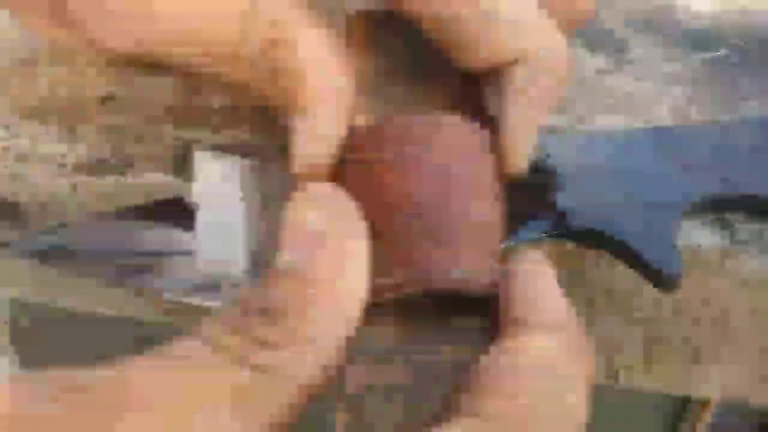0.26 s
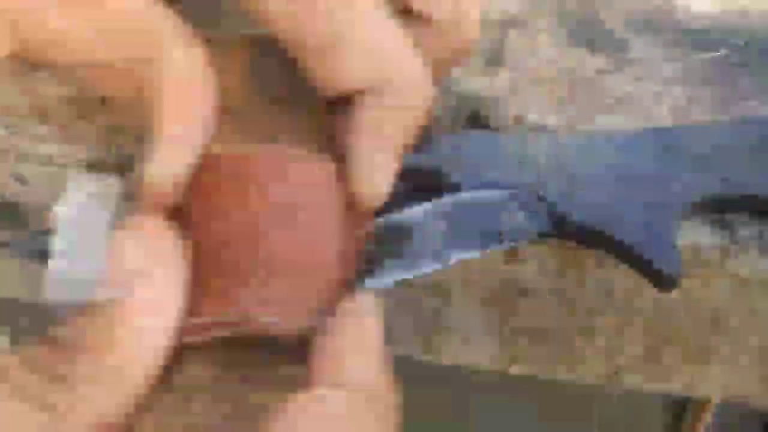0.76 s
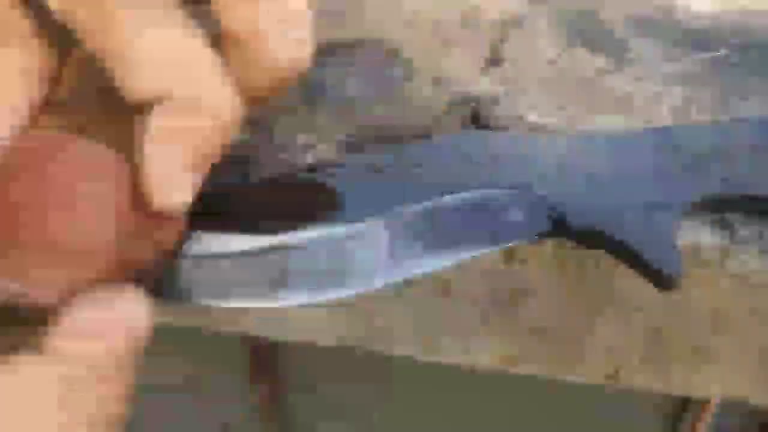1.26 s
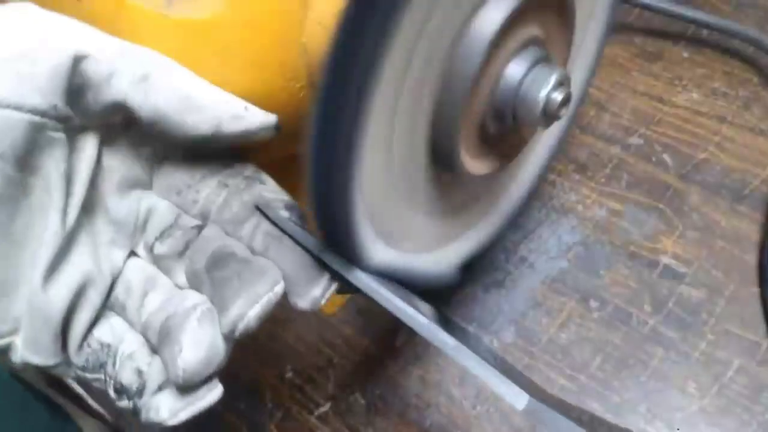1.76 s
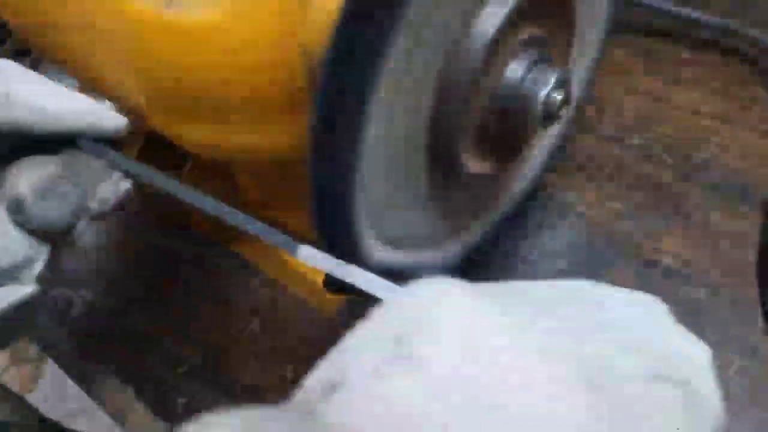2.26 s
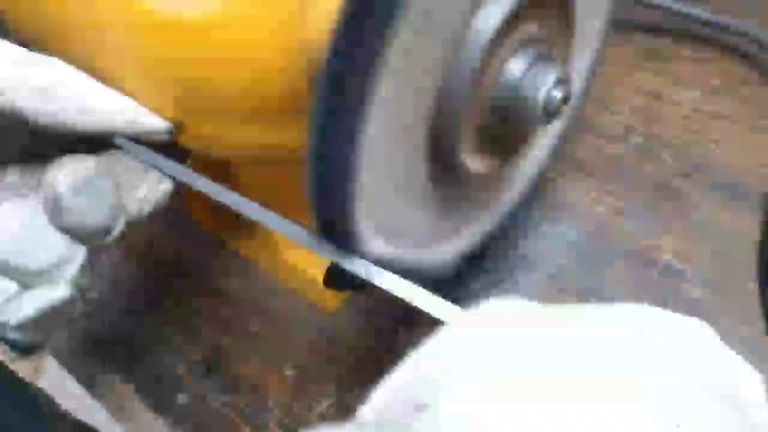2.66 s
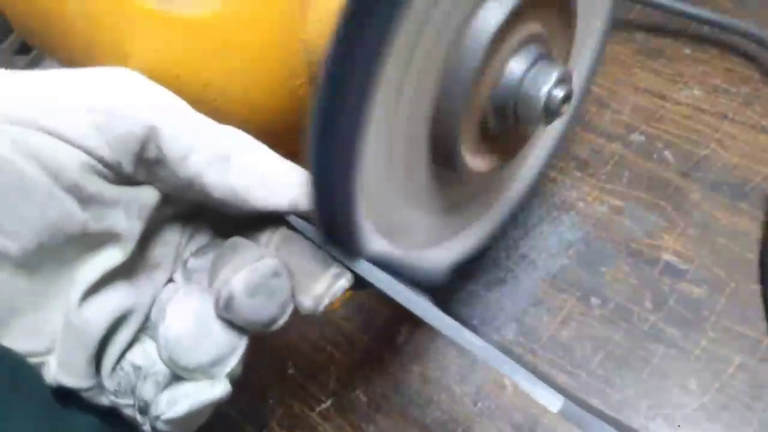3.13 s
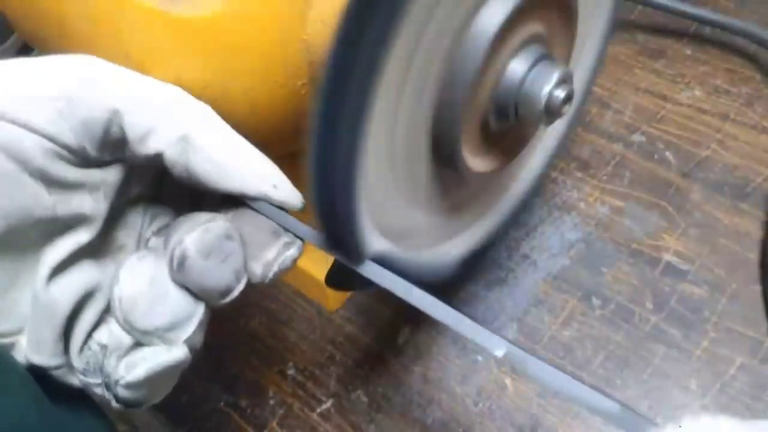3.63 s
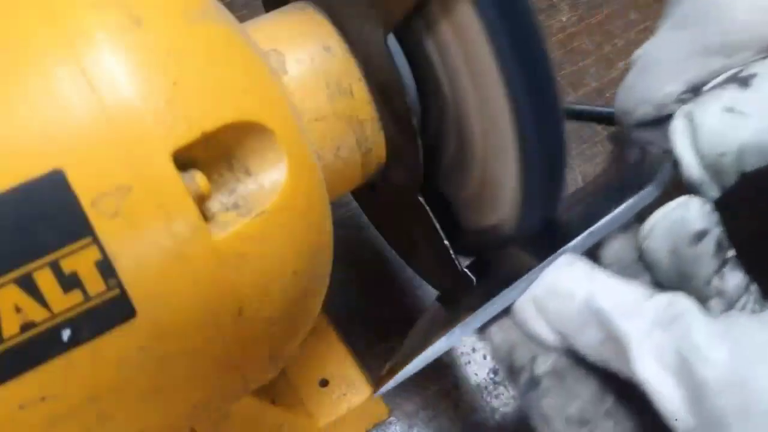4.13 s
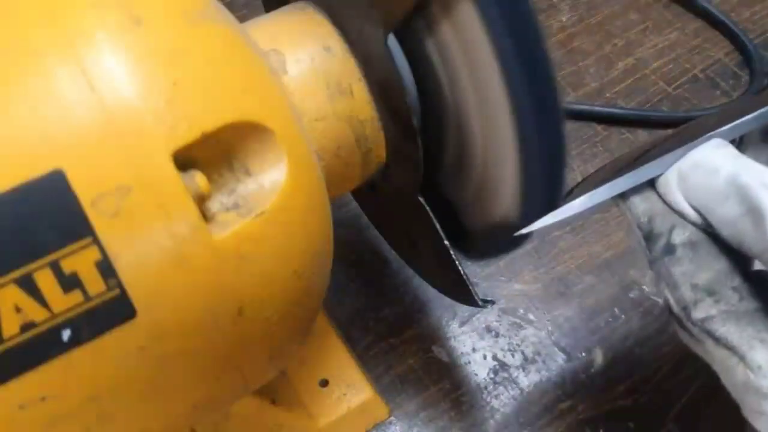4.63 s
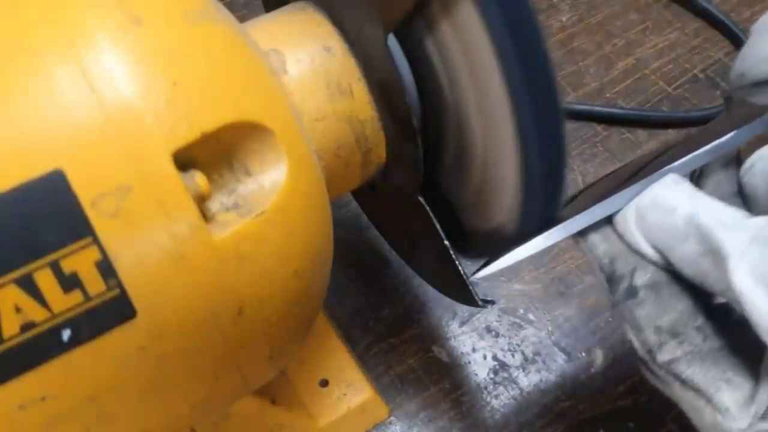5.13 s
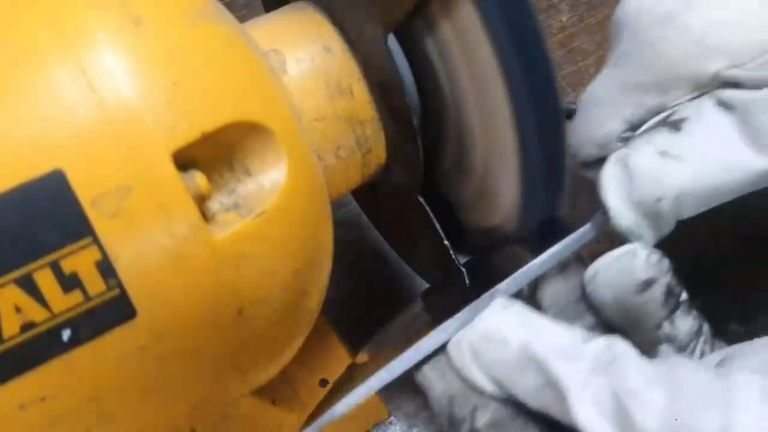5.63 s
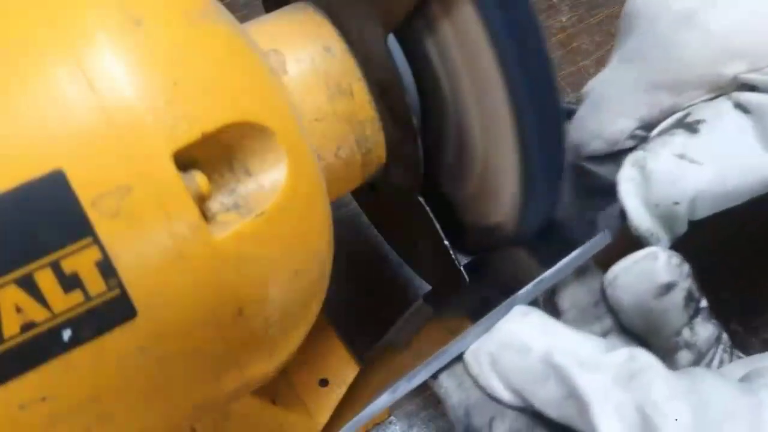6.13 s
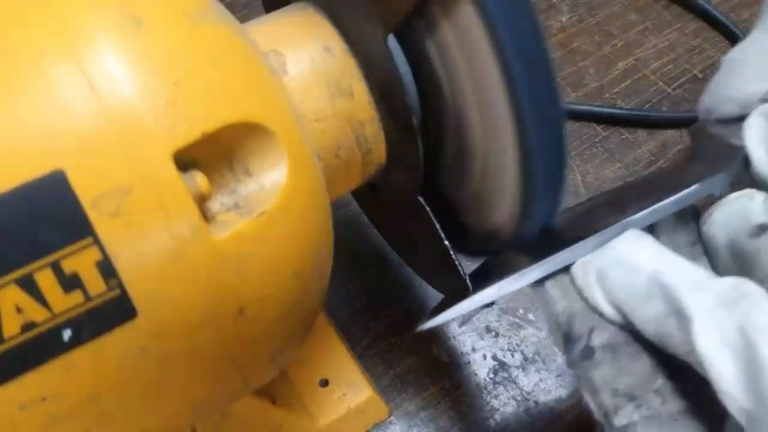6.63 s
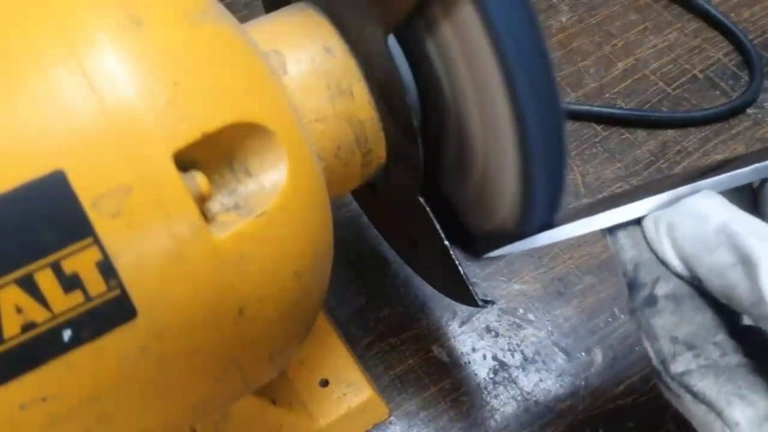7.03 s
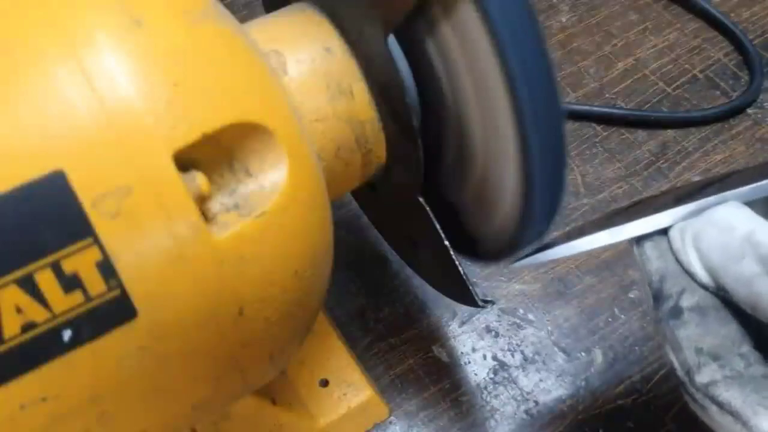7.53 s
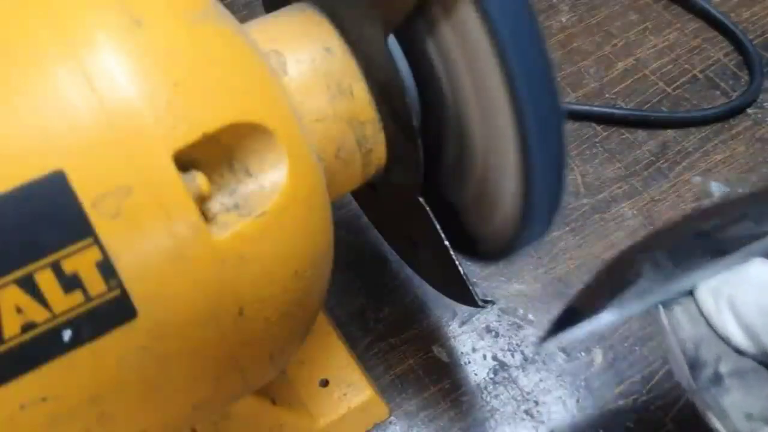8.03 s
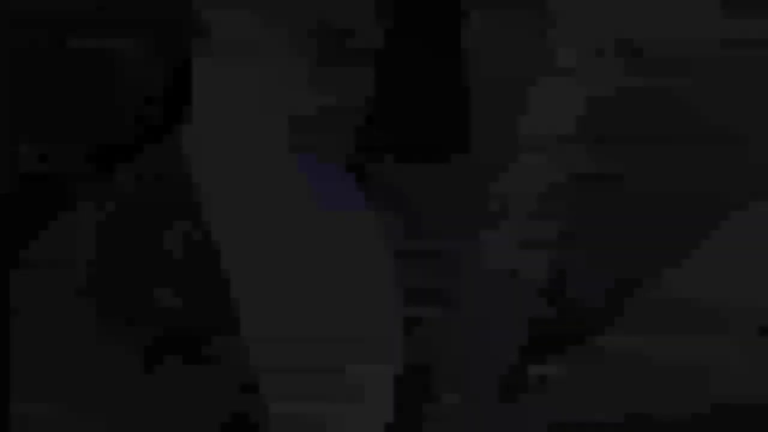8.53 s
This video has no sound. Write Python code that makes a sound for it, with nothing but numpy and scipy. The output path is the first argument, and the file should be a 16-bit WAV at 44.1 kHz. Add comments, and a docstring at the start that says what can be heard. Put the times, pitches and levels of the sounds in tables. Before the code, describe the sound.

Close workshop sounds. Very fast sandpaper strokes rasp over a steel blade, about ten a second, bright and hissy. A cut brings a spinning wheel scraping the blade, with shifting metallic ringing over a low motor hum. A second angle continues the scrape, which lifts off to leave the motor idling. It cuts to faint dull background, soft rubs and low handling thumps, mainly on the left.

```python
"""A steel blade makes two passes over a bench grinder's buffing wheel: random rim roughness, repeated each turn,
is filtered into scrape and blade modes over a motor hum that sags under load and idles at the end.
Before it, quick sandpaper strokes along the blade: grit noise and steel modes gated by hand speed.
After it, a quiet spot of faint noise and soft rubs. Low swept thumps, most of them late, favour one port
or the other of a two-port microphone, at last the left."""
import sys
import numpy as np
from scipy import signal
from scipy.fft import irfft
from scipy.io import wavfile
from scipy.ndimage import uniform_filter1d

SR = 44100
rng = np.random.default_rng(int(sys.argv[2]) if len(sys.argv) > 2 else 0)


def persist_wave(psi):
    """Save psi, clipped to +-1, as 16-bit WAV."""
    counts = np.round(np.clip(psi, -1, 1) * 32767).astype(np.int16)
    wavfile.write(sys.argv[1], SR, np.atleast_2d(counts).T)


def volts_from_decibels(level):
    """Turn decibel levels (scalar or array-like) into linear amplitude factors."""
    exponent = np.asarray(level, float) / 20
    return 10 ** exponent


N = 387193
FRAME = 1024  # samples in a short-time spectrum
HZ = np.fft.rfftfreq(FRAME, 1 / SR)[:, None]


def power_of(db):
    """Decibels to a power ratio."""
    return volts_from_decibels(2 * np.asarray(db))


def read(points, hz=HZ):
    """Value of a (hz, value) table, interpolated on a log frequency axis."""
    f, value = np.transpose(points)
    return np.interp(np.log(hz + 1), np.log(f + 1), value)


def bump(hz, width):
    """Power curve of a steep-sided resonance; width lies between its quarter-power points."""
    return 1 / (1 + (2 * (HZ - hz) / width) ** 2) ** 2


def lifts(modes):
    """Power curve of (hz, width_hz, lift_db) resonances standing on a flat base."""
    return 1 + sum((power_of(db) - 1) * bump(f, w) for f, w, db in modes)


def unit(power, lo_hz=0, hi_hz=30000):
    """Scales a power shape so that white noise leaves it with rms 1 inside the band."""
    return power * len(HZ) / (power * ((HZ >= lo_hz) & (HZ < hi_hz))).sum(0)


def spectra(x):
    """Short-time spectra and their times."""
    return signal.stft(x, SR, nperseg=FRAME, noverlap=FRAME * 3 // 4)[1:]


def noise(size):
    """Spectra of two unrelated white noises."""
    return spectra(rng.standard_normal((2, size)))[1]


def grit(shape, spread_db):
    """Dense random grains, a few larger; rms 1."""
    x = rng.standard_normal(shape) * volts_from_decibels(spread_db * np.minimum(rng.exponential(1, shape[-1]), 4.5))
    return x / x.std()


def patchy(frames, across, size):
    """Random dB field of rms 1, smoothed over `across` frames and `size` frequency bins."""
    field = rng.standard_normal((frames, len(HZ)))
    field = uniform_filter1d(uniform_filter1d(field, across, 0), size, 1).T
    return field / field.std()


def heard(z, power, same, left, size):
    """Two microphone ports: colours two raw drives and blends them; power is that of the ports' mean."""
    likeness = np.clip(read(same), -np.sqrt(.5), 1)
    left_gain = volts_from_decibels(read(left))
    lag_phase = 2 * np.pi * HZ * 4e-5  # the left port hears 40 microseconds later
    pair = np.array([left_gain * z[0] * np.exp(-1j * lag_phase),
                     likeness * z[0] + np.sqrt(1 - likeness ** 2) * z[1]])
    mean_gain = np.sqrt(1 + left_gain ** 2 + 2 * likeness * left_gain * np.cos(lag_phase)) / 2
    pair *= np.sqrt(power) / mean_gain
    return signal.istft(pair, SR, nperseg=FRAME, noverlap=FRAME * 3 // 4)[1][:, :size]


QUIET_START_S = 8.584
# dull background of the quiet spot: hz, relative level_db
QUIET_SPECTRUM = [(40, 9), (300, 1), (600, -11), (790, -18), (950, -4.5), (1200, -21), (1450, -24),
                  (2200, -29), (6500, -38), (16000, -47)]
# faint rubs: peak_s, level_db, swell_s
RUBS = [(8.6, -71, 0.018), (8.71, -64, 0.013), (8.76, -65, .014)]
# resonances of the rubs: hz, width_hz, relative level_db
RUB_RING = [(950, 130, 0.), (1210, 150, -2)]
# microphone ports; one table each for the sanding, the two passes and the quiet spot
# hz, left-right likeness (clipped to -0.71..1)
PORT_LIKENESS = [
    [(60, 2), (380, 0.7), (2380, 0.2), (15000, -0.26)],
    [(60, -3.5), (380, 0.68), (2380, 0.24), (15000, -0.06)],
    [(60, -1), (240, 1.25), (950, 0.09), (3770, 0.5), (15000, -0.42)],
    [(60, 1), (15000, 0)],
]
# hz, left over right level_db
PORT_BALANCE = [
    [(60, 0.58), (150, 1.4), (380, 2.6), (950, 9.7), (2380, 6.5), (5980, 1.9), (9500, 7), (15000, 13)],
    [(60, -20), (130, -11), (290, -8), (640, 6.5), (1410, 5), (3100, -2), (6820, 8), (15000, 10)],
    [(60, 0.5), (130, 1.0), (290, 0.55), (640, 3.4), (1410, 7.7), (3100, 4.5), (6820, 1.4), (9500, 6.8),
     (15000, 3.5)],
    [(100, 7.1), (1000, 7.1), (15000, 4.4)],
]


def quiet_spot():
    """Dull shaped noise, a lingering hiss that dies, and rubs as resonant noise under smooth swells."""
    s = np.arange(round(QUIET_START_S * SR), N) / SR

    def placed(power):
        return heard(noise(len(s)), power, PORT_LIKENESS[3], PORT_BALANCE[3], len(s))

    bed = volts_from_decibels(-70) * placed(unit(power_of(read(QUIET_SPECTRUM)), 700))
    ring = placed(unit(sum(power_of(db) * bump(f, w) for f, w, db in RUB_RING)))
    hiss = volts_from_decibels(-73) * placed(unit(bump(3000, 9000))) * np.clip((8.63 - s) / .03, 0, 1)
    swells = sum(volts_from_decibels(db) * np.exp(-((s - at) / swell) ** 2) for at, db, swell in RUBS)
    return bed + hiss + ring * swells


# low thumps: peak_s, level_db, base pitch_hz (swept from 0.72 up to 1.52 times), swell_s, left over right level_db
THUMPS = [(4.6, -50, 119, 0.013, -8), (7.582, -52, 129, 0.022, -10), (7.67, -47, 109.5, 0.034, 16),
          (8.391, -50, 90, 0.041, 18), (8.595, -45, 149.6, 0.0056, 17), (8.637, -25.5, 140.4, 0.0078, 20),
          (8.665, -37.5, 95.4, 0.012, 13), (8.761, -30, 103.6, 0.012, 18)]


def thumps():
    """A few wobbling low cycles each, swelling and dying, highest in pitch at the peak."""
    out = np.zeros((2, N))
    for (at, db, hz, rise, left_db), phase in zip(THUMPS, rng.random((len(THUMPS), 2))):
        t = np.arange(-.08, min(.12, N / SR - at), 1 / SR)
        size = np.exp(np.where(t < 0, t / rise, -t / (0.92 * rise)))
        turns = np.cumsum(hz * (0.72 + 0.8 * size ** 3)) / SR
        wave = np.sin(2 * np.pi * (turns + phase[0]))
        wave = wave + 0.15 * size * np.sin(2 * np.pi * (2.3 * turns + phase[1]))
        pair = np.array([wave, np.roll(wave, round(0.0027 * SR))])  # 2.7 ms later on the right
        ports = 2 / (1 + volts_from_decibels([[-left_db], [left_db]]))
        thump = volts_from_decibels(db) * ports * uniform_filter1d(size, 150) * pair
        part = out[:, round((at - .08) * SR):][:, :len(t)]
        part += thump[:, :part.shape[1]]
    return out


# one row a stroke, pulls and pushes in turn:
# start_s, end_s, hiss level_db, first bite over the hiss level_db, blade rasp level_db
STROKES = [(0.0, 0.017, -36, 5.5, -51), (0.033, 0.072, -31.5, -3, -51.5), (0.088, 0.124, -33.5, 1.5, -52.5),
           (0.139, 0.177, -36, 1, -52.5), (0.189, 0.231, -32.5, 1.5, -57), (0.243, 0.285, -36.5, -2, -50.5),
           (0.297, 0.34, -34, 2, -56.5), (0.356, 0.394, -33.5, -3, -47.5), (0.406, 0.448, -37, 4.5, -58),
           (0.46, 0.5, -37.5, 1, -46), (0.513, 0.551, -39, 6.5, -54), (0.563, 0.603, -35.5, 0.5, -44.5),
           (0.614, 0.651, -36.5, 1, -56), (0.666, 0.706, -34, -2.5, -46), (0.721, 0.755, -37, 4, -58),
           (0.768, 0.81, -32, -9, -46.5), (0.827, 0.856, -36, 5, -58), (0.873, 0.918, -31, -7, -51.5),
           (0.933, 0.963, -35.5, 5.5, -63), (0.979, 1.021, -32, 2.5, -56.5),
           (1.034, 1.068, -33, -1.5, -57.5), (1.09, 1.125, -37, 4, -60), (1.136, 1.17, -33, 1.5, -53.5),
           (1.18, 1.222, -34, -2, -57.5), (1.238, 1.273, -34.5, 5.5, -59), (1.286, 1.328, -35, 0, -51.5),
           (1.34, 1.381, -30.5, -1, -58), (1.391, 1.429, -33.5, -5, -49.5), (1.444, 1.459, -28, -1, -60)]
# grit hiss: hz, relative level_db
PAPER = [(2060, -49), (3500, -13.5), (5040, -10), (6200, -9), (7530, -2.5), (8220, 2.5), (9440, 5),
         (12800, -7), (16000, -7)]
# clamped blade modes: hz, base width_hz (played 1.6 times wider), relative level_db
RASP = [(1652, 35, 7.5), (1935, 22, 7), (2700, 560, 4.5), (4970, 290, 2.5)]
# shop background: hz, relative level_db
SHOP = [(30, -48), (60, -14), (100, -15), (240, 0), (400, -15), (900, -20), (1700, -9), (5000, -1.5),
        (16000, -34)]


def sanding():
    """Each stroke drags grit over steel, hissing and shaking blade modes; the hand stops briefly at each turn."""
    size = round(1.47 * SR)
    s = np.arange(size) / SR
    same, left = PORT_LIKENESS[0], PORT_BALANCE[0]
    start, end, hiss_db, early_db, rasp_db = np.transpose(STROKES)
    # level knots: the first bite of each stroke, then its body
    knots = np.ravel([start + 0.038 * (end - start), start + 0.37 * (end - start)], "F")
    hiss_level = volts_from_decibels(np.interp(s, knots, np.ravel([hiss_db + early_db, hiss_db], "F")))
    rasp_level = volts_from_decibels(np.interp(s, knots, np.ravel([rasp_db + 3, rasp_db], "F")))
    inside = np.max([np.minimum((s - a + 0.0016) / 0.0026, (b - s) / 0.0013) for a, b in zip(start, end)], 0)
    speed = 1 / (1 + np.exp(-1.5 * inside))

    t, z = spectra(grit((2, size), spread_db=1.5))
    paper = power_of(read(PAPER) + 2.2 * patchy(len(t), 5, size=25))
    hiss = heard(z, unit(paper, 5200), same, left, size) * hiss_level * (speed + volts_from_decibels(-39.0))
    catch = uniform_filter1d(rng.standard_normal(size), size=90)
    hiss = hiss * volts_from_decibels(1.3 * catch / catch.std())  # the paper catches and slips

    modes = sum(power_of(db) * bump(f, 1.6 * w) for f, w, db in RASP) + power_of(-1.0) * bump(3860, 4200)
    modes = modes * power_of(2.5 * patchy(len(t), 8, size=10))  # the rasp's colour flickers
    rasp = heard(noise(size), unit(modes, 1200, 5160), same, left, size)
    rasp *= rasp_level * (speed + volts_from_decibels(-11.))  # the steel sounds on through the turn

    room = heard(noise(size), power_of(-54) * unit(power_of(read(SHOP))), same, left, size)
    return (hiss + rasp + room) * np.clip((end[-1] - 0.001 - s) / 0.0028, 0, 1)


# share of the rim that returns each turn, before the caller's repeat factor: hz, share
REPEATS = [(100, 0.22), (800, 0.95), (3000, 0.69), (7000, 0.56), (15000, 0.4)]


def rim(turns, s, drift_per_s, high_spot, repeat):
    """Roughness read off the wheel rim each turn; the track under the blade slowly wanders to a new one."""
    track = drift_per_s * (s - s[0])
    steps = rng.standard_normal((2, 2, int(track[-1]) + 2, 300))
    phase = 2 * np.pi * rng.random((2, 1, 300)) + np.cumsum(steps[0], 1)
    rows = irfft(volts_from_decibels(1.8 * steps[1]) * np.exp(1j * phase), 2400)  # one turn of rim per track
    at, row, part = (turns % 1 * 2400).astype(int), track.astype(int), track % 1
    swell = np.exp(high_spot * np.cos(2 * np.pi * turns))  # the wheel is a little out of round
    returning = ((1 - part) * rows[:, row, at] + part * rows[:, row + 1, at]) * swell
    fresh = grit(returning.shape, spread_db=1.3)
    t, (a, b) = spectra(np.array([returning / returning.std(), fresh]))
    share = np.clip(repeat * read(REPEATS), 0, 1)
    return t + s[0], np.sqrt(share) * a + np.sqrt(1 - share) * b


# one row a pass, running free: shaft tone level_db, bench rumble level_db, wheel whirr level_db
MOTOR = [(-62, -74, -50.5), (-57.5, -70, -53)]
# shaft tones: multiple of the turn rate, relative level_db, gain in dB for each turn a second lost
SHAFT = [(1, -0.5, 0), (2, -15, 2.5), (3, -10.5, -3.5), (4, -12.5, 1.9), (5, -13.5, -1.4), (6, -19, -0.6)]
# bench rumble: hz, relative level_db
RUMBLE = [(30, -35), (60, -5), (110, -8), (300, -14.5), (480, -24.5), (700, -14), (1300, -41)]
# wheel whirr: hz, relative level_db
WHIRR = [(300, -12), (500, -11), (1500, -17), (4000, -19), (9000, -18), (11000, -19.5), (16000, -15.5)]
# motor housing modes: hz, width_hz, lift_db
WHINES = [(5280, 230, 9.5), (6450, 150, 10.5), (7625, 440, 21), (9120, 330, 9), (12900, 620, 7.5)]
# microphone ports for the motor: hz, left-right likeness
MOTOR_LIKENESS = [(60, 0.27), (300, 1), (900, 0.49), (4000, .1)]
# hz, left over right level_db
MOTOR_BALANCE = [(60, 4.5), (130, 2.1), (290, 2.0), (640, 4.5), (1410, 4.4), (3100, 1.9), (6820, 20),
                 (15000, 11)]
# hum change for each turn a second lost under load, one a pass [dB]
HUM_SAG_DB = [-0.48, -2]
# the motor swells in and thins out over these times, one a pass [s]
MOTOR_IN_S = [0.18, .01]
MOTOR_OUT_S = [0.0026, 0.042]


def motor(k, s, speed, turns):
    """Shaft harmonics follow the turn rate; partly repeating rim noise drives bench rumble and housing whines."""
    start, end, _ = PASSES[k]
    shaft_db, rumble_db, whirr_db = MOTOR[k]
    t, z = rim(turns, s, drift_per_s=12.0, high_spot=0.31, repeat=0.46)
    rumble = power_of(rumble_db) * unit(power_of(read(RUMBLE)), 95, 480)
    whirr = unit(lifts(WHINES) * power_of(read(WHIRR)))
    whirr = whirr * power_of(2.4 * patchy(len(t), 14, size=8))  # the whirr flickers
    whirr = whirr / lifts(WHINES) ** np.clip((t - 8.47) / 0.065, 0, 1)  # the whines fade first
    whirr = whirr * power_of(whirr_db - 2.4 * np.clip((t - 8.47) / 0.2, 0, 1))

    lost = 75.67 - speed  # turns a second below free running
    waver_db = 3 * patchy(len(t), 30, size=1)
    tones = 0
    for (m, db, load_db), w in zip(SHAFT, waver_db):
        level_db = db + load_db * lost + (m > 1) * np.interp(s, t, w)  # only the overtones waver
        tones = tones + volts_from_decibels(level_db) * np.sin(2 * np.pi * (m * turns + rng.random()))
    hum = np.sqrt(2) * volts_from_decibels(shaft_db + HUM_SAG_DB[k] * lost) * tones * volts_from_decibels([[1.5], [-1.5]])

    edge = 1 - np.clip(np.minimum((s - start) / MOTOR_IN_S[k], (end - s) / MOTOR_OUT_S[k]), 0, 1)
    return (hum + heard(z, rumble + whirr, MOTOR_LIKENESS, MOTOR_BALANCE, len(s))) * volts_from_decibels(-5 * edge)


# blade modes that sing out while the grip frees them: start_s, end_s, pitch_hz, full lift_db
SINGS = [(1.48, 2.35, 944, 6.5), (1.84, 2.35, 2830, 9), (2.13, 2.36, 2280, 12.5), (2.88, 3.16, 720, 9),
         (2.66, 3.155, 973, 9), (2.56, 3.2, 2300, 7), (3.24, 3.94, 993, 12.5), (3.24, 3.54, 1800, 11),
         (3.3, 3.65, 3280, 8.5), (3.49, 3.98, 2230, 14.5), (3.59, 4.02, 723, 11), (3.998, 4.55, 2280, 7.5),
         (3.96, 4.6, 2400, 9), (3.94, 4.9, 2810, 2.5), (3.993, 4.3, 3200, 11), (5.68, 5.92, 2750, 5.5),
         (4.65, 4.97, 1470, 9), (5.25, 5.698, 2620, 7.5), (5.647, 6.2, 1545, 12), (5.7, 6.1, 2330, 10),
         (5.947, 6.6, 2060, 11), (5.9, 6.75, 1910, 10.5), (3.997, 4.3, 1270, 8.5), (7.24, 7.52, 2170, 6),
         (7.2, 7.52, 1900, 14.5), (1.55, 2.13, 6750, 8.5), (1.42, 1.86, 9700, 7), (2.1, 2.9, 5130, 9.5),
         (2.74, 3.25, 8320, 8), (2.9, 3.95, 11600, 6.5), (3.1, 4.1, 3950, 7.5), (3.1, 3.7, 14300, 7),
         (3.3, 4.06, 5120, 8), (3.2, 3.8, 7400, 5), (4.55, 5.7, 5300, 3), (4.56, 5.2, 8360, 6),
         (5.7, 6.25, 6550, 6), (6.1, 6.75, 6350, 4), (6, 7.05, 7870, 4), (5.9, 6.7, 13200, 4)]


def singing(t):
    """Power lift of the blade modes that are free at each moment; higher modes are wider."""
    lift = 1
    for start, end, hz, db in SINGS:
        free = np.clip(np.minimum(t - start, end - t) / .22 + .5, 0, 1) ** 2
        lift = lift + (power_of(db) - 1) * bump(hz, 45 + .03 * hz) * free
    return lift


# blade on the wheel, one table a pass:
# time_s, scrape level_db, how freely the blade flexes (0-1), low flexing pitch_hz, middle flexing pitch_hz
CONTACT = [
    [(1.49, -47.5, 0.16, 910, 2900), (1.59, -37.5, 0.4, 980, 3270), (1.97, -38.5, 0.38, 990, 3000),
     (2.13, -40.5, 0.88, 1000, 3300), (2.32, -37.5, 0.69, 950, 2700), (2.41, -47, 0.2, 810, 2770),
     (2.55, -47, 0.4, 780, 2920), (2.68, -40, 0.58, 1050, 2510), (2.96, -36.5, 0.65, 950, 2500),
     (3.2, -37, 0.34, 1030, 2770), (3.46, -36, 0.56, 1085, 2790), (3.68, -38, 0.54, 914, 2630),
     (3.88, -34.5, 0.66, 890, 2800), (3.94, -43, 0.83, 870, 2500), (4.0, -43, 1, 939, 2600)],
    [(4.01, -37, 0.94, 905, 2500), (4.15, -37.5, 0.92, 1050, 2500), (4.43, -37.5, 0.85, 950, 2570),
     (4.66, -36.5, 0.43, 930, 2600), (4.87, -37.5, 0.3, 890, 2900), (5.25, -41.5, 0.47, 830, 2700),
     (5.42, -41, 0.49, 1260, 2580), (5.59, -41.5, 0.57, 950, 2440), (5.79, -39, 0.91, 1055, 2500),
     (5.97, -37, 0.43, 925, 2260), (6.15, -37.5, 0.7, 950, 2700), (6.38, -36.5, 0.66, 1040, 2750),
     (6.48, -37.5, 0.67, 900, 2810), (7.01, -40, 0.6, 915, 3100), (7.18, -43, 0.46, 950, 3000),
     (7.26, -41, 0, 980, 2600), (7.35, -41.5, 0.2, 1100, 2030), (7.48, -39.5, 0.52, 1040, 2100),
     (7.57, -63, 0.1, 900, 2200), (7.62, -60, .3, 900, 2200)],
]
# scrape, one table a pass: hz, relative level_db
SCRAPE = [
    [(240, -56), (450, -39), (706, -36), (1140, -19), (1800, -14), (2100, -17), (2600, -6.5), (4380, -4),
     (5120, -7.5), (9000, -4.5), (16000, -7.5)],
    [(240, -68), (400, -13.5), (650, -29), (931, -31), (2000, -10.5), (2770, -3.5), (4400, -5), (5790, -2),
     (10000, -6), (16000, -8.5)],
]
# sharp blade modes, one table a pass: hz, width_hz, lift_db (eased above 4 kHz under hard flexing)
BLADE = [
    [(609.4, 33, 13), (717, 230, 5), (1286, 130, 6.5), (1780, 180, 7.5)],
    [(810, 45, 12.5), (957.4, 33, 9.5), (2171, 59, 8.5), (2530, 150, -11), (2805, 19, 10.5),
     (5276, 250, 6.5), (6690, 220, 3)],
]
# low flexing, middle flexing, tang ring, edge ring, one list a pass:
# level_db over the scrape when held stiff, dB gained when free
FLEX_DB = [
    [(-18.5, 15.5), (-23, 17.5), (-23, 18), (-7.5, 0.5)],
    [(-18.5, 13.5), (-22, 25), (-19, 6), (-13, 4.5)],
]
# widths of those four [Hz], then the tang and edge ring pitches [Hz]
FLEX_WIDTH_HZ = [310, 750, 533, 2260]
RING_HZ = [1460, 5940]
# band of the once-a-turn throb [Hz], and its greatest depth in each pass
THROB_HZ = [1900, 3800]
THROB_DEPTH = [.4, .85]


def blade_on_wheel(k, s, turns):
    """The rim scrapes the blade and shakes its flexing modes, tang and edge."""
    t, z = rim(turns, s, drift_per_s=6.0, high_spot=.09, repeat=1.0)
    at, *columns = np.transpose(CONTACT[k])
    scrape_db, free, low_hz, middle_hz = (np.interp(t, at, c) for c in columns)
    flex_db = [scrape_db + stiff_db + gain_db * free for stiff_db, gain_db in FLEX_DB[k]]
    press = np.clip((flex_db[1] + 38.5) / 10.0, 0, 1)  # hard flexing damps the high modes
    rings = 1 + (lifts(BLADE[k]) - 1) * (1 - press * (HZ > 4000))
    power = power_of(scrape_db) * unit(rings * power_of(read(SCRAPE[k])), 8380)
    for db, hz, width in zip(flex_db, [low_hz, middle_hz, *RING_HZ], FLEX_WIDTH_HZ):
        power += power_of(db) * unit(rings * bump(hz, width))

    # small modes come and go as the grip shifts
    shimmer_db = 1.6 * patchy(len(t), 60, size=3)
    shimmer_db = shimmer_db + 1.5 * np.minimum(HZ / 4000, 1) * patchy(len(t), 70, size=11)
    power *= singing(t) * power_of(shimmer_db)
    lifted = np.clip((at[-1] - t) / 0.11, 0, 1) ** 2  # the blade leaves the wheel
    blade = heard(z, lifted * power, PORT_LIKENESS[k + 1], PORT_BALANCE[k + 1], len(s))

    # the high spot of the rim kicks the middle modes once a turn
    middle = signal.sosfiltfilt(signal.butter(2, THROB_HZ, "bandpass", fs=SR, output="sos"), blade)
    depth = THROB_DEPTH[k] * np.interp(s, t, np.clip(3 * free - 1.6, 0, 1))
    throb = np.exp(depth * np.cos(2 * np.pi * turns)) / np.sqrt(np.i0(2 * depth))
    return blade + middle * (throb - 1)


# passes over the wheel: start_s, end_s, rise_s
PASSES = [(1.482, 4.006, .01), (4.007, 8.582, .001)]
# wheel speed, one table a pass: time_s, turns per s
SPEED = [
    [(1.5, 73.6), (1.94, 73.3), (2.15, 72.2), (2.27, 72.4), (2.38, 73.9), (2.47, 74.0), (2.98, 71.6),
     (3.16, 72.7), (3.64, 71.4), (3.85, 69.9), (3.98, 71.4)],
    [(4.02, 70.7), (4.29, 72.2), (4.44, 72.4), (4.66, 73.6), (4.91, 73.9), (5.54, 73.7), (5.79, 72.6),
     (7.5, 75.2), (7.54, 75.7), (7.58, 75.6)],
]


def buffing(k):
    """One pass: the turning wheel works the blade while its motor hums under it."""
    start, end, rise = PASSES[k]
    s = np.arange(start, end, 1 / SR)
    speed = np.interp(s, *np.transpose(SPEED[k]))
    turns = np.cumsum(speed) / SR
    fade = np.clip(np.minimum((s - start) / rise, (end - s) / 0.0013), 0, 1)
    return (blade_on_wheel(k, s, turns) + motor(k, s, speed, turns)) * fade


def scene():
    """Sanding, two passes at the wheel and the quiet spot in turn, over thumps and a very faint noise floor."""
    mix = volts_from_decibels(-116.0) * rng.standard_normal((2, N)) + thumps()
    starts = (0, PASSES[0][0], PASSES[1][0], QUIET_START_S)
    for start, part in zip(starts, (sanding(), buffing(0), buffing(1), quiet_spot())):
        mix[:, round(start * SR):][:, :part.shape[1]] += part
    return mix


def top_cut(x):
    """Nothing passes above the cut-off."""
    return signal.sosfilt(signal.butter(12, 16450, fs=SR, output="sos"), x)


def record(dry):
    """Limits the band of both ports with a steep low-pass at 15650 Hz."""
    low_pass = signal.firwin(401, 15650, window=("kaiser", 8), fs=SR)
    finished = signal.oaconvolve(dry, low_pass[None], "same")
    return top_cut(finished)


dry = scene()
out = record(dry)
persist_wave(out)
```